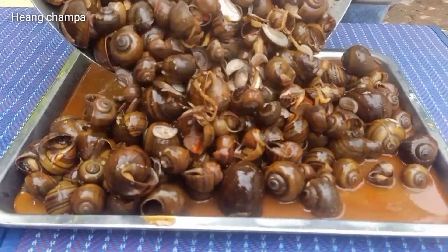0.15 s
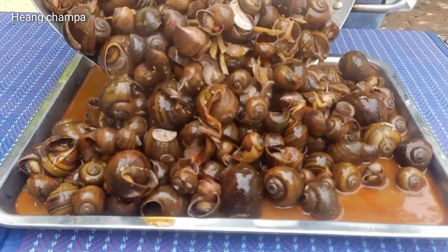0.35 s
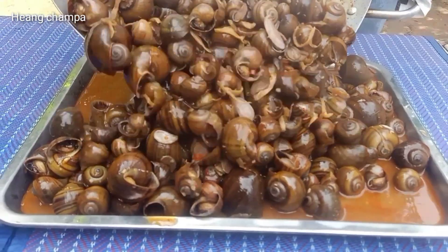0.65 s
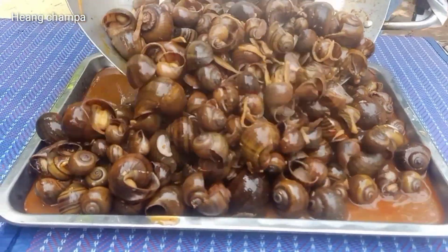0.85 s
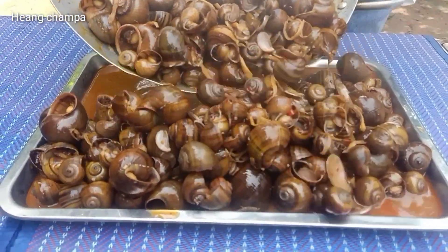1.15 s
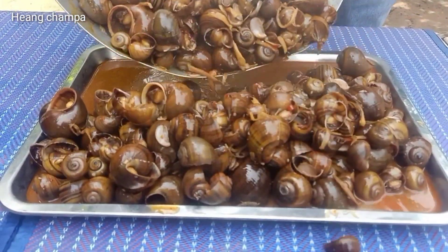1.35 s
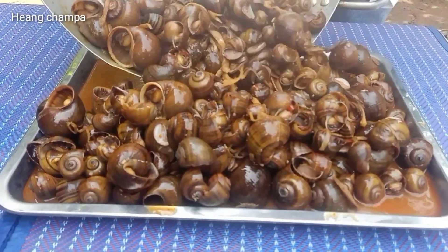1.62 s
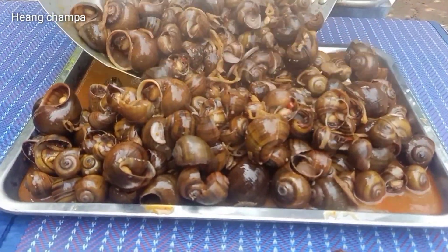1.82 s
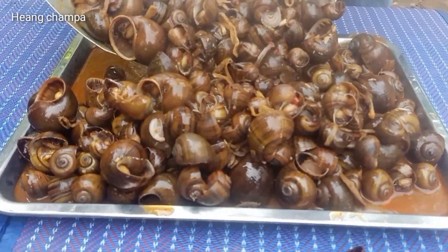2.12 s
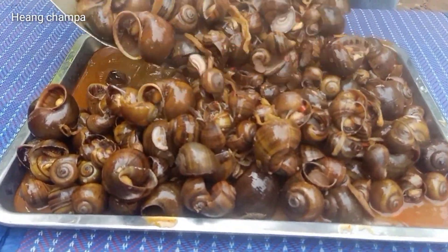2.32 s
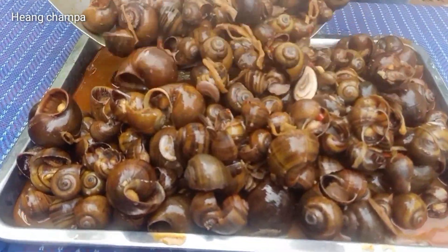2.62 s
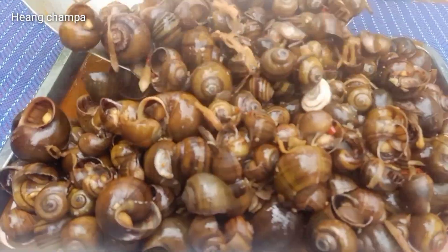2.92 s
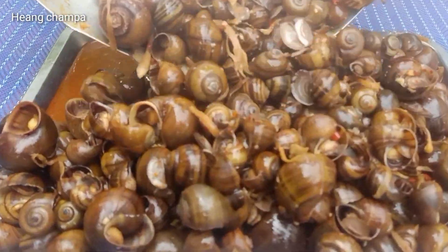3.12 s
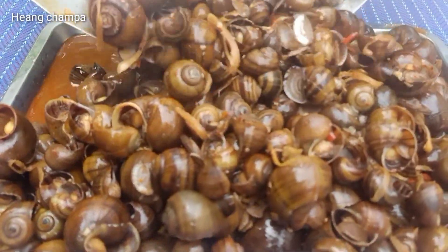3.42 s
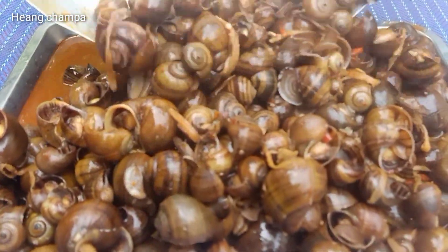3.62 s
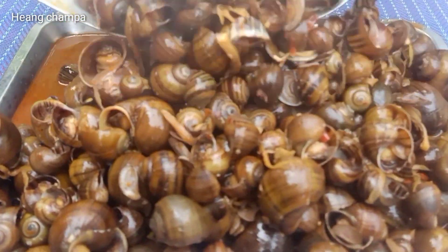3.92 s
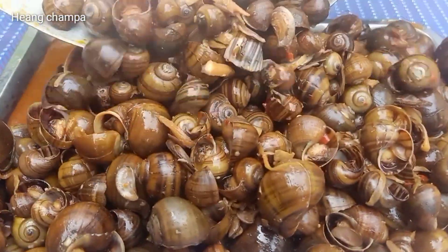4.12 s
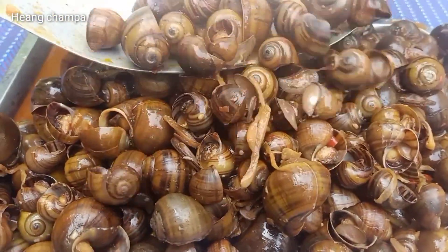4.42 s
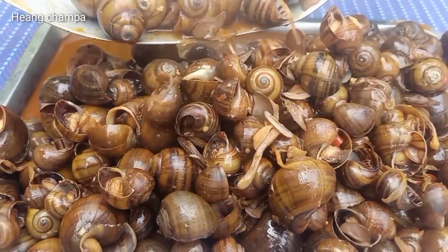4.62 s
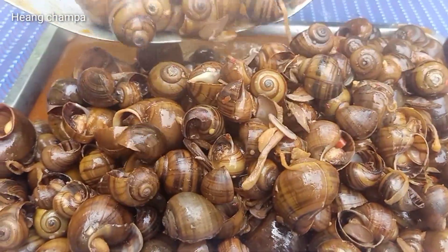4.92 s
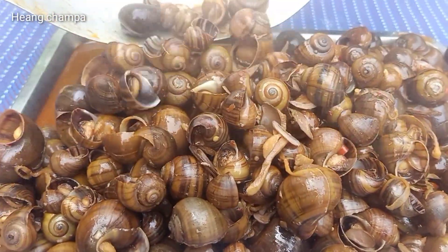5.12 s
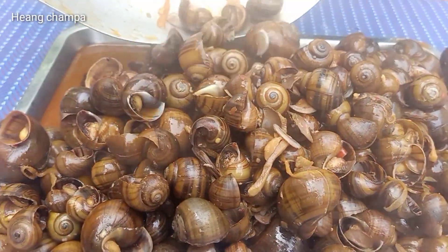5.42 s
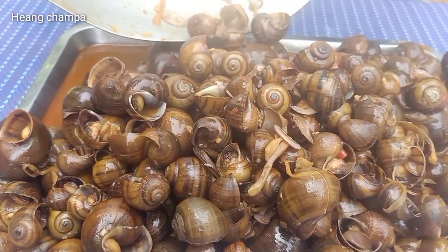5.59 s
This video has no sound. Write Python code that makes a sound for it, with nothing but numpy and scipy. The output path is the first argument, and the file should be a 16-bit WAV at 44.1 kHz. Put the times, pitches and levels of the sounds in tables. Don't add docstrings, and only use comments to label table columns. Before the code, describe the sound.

Close to a stereo microphone in quiet open air, wet snail shells are shaken from a metal pan onto a steel tray. Uneven surges of hollow knocks and thin ticks come from the start, with brief pan rings and low thuds; between them the rattle thins to a trickle. Near five seconds it almost stops, a bubble squeaks, then the last shakes clatter.

```python
import sys
import numpy as np
from scipy import signal
from scipy.fft import rfft, irfft
from scipy.io import wavfile
from scipy.ndimage import uniform_filter1d

SR = 44100
rng = np.random.default_rng(int(sys.argv[2]) if len(sys.argv) > 2 else 0)


def rack_gain(trim_db):
    fader = np.asarray(trim_db, float)
    return 10 ** (fader / 20)


def output_pcm(signal):
    pcm = np.clip(np.atleast_2d(signal).T, -1, 1) * 32767
    wavfile.write(sys.argv[1], SR, np.round(pcm).astype(np.int16))


N = 253575

# frequency in Hz, level in dB per Hz.
AIR_COLOUR = [(15, -39), (25, -30), (263, 41), (1400, -31), (2610, 27.5), (8140, 16.5), (13600, -13),
              (16000, -53)]
# frequency in Hz, likeness from 0 to 1.
PORT_LIKENESS = [(40, .55), (130, .97), (300, .997), (850, .99), (1600, .78), (3000, .35)]
# frequency in Hz, left over right in dB.
PORT_TILT = [(100, 0.4), (2000, 3), (4800, -1.5), (14000, 5)]
# time in seconds, pitch in Hz, level in dB.
BUBBLE = [
    (5.02, 2370, -60),
    (5.037, 2760, -37),
    (5.061, 3150, -50),
    (5.085, 3450, -48),
]
# start in seconds, peak in dB, tray pitch in Hz.
THUDS = [
    (0.046, -31, 179),
    (1.52, -21.5, 140),
    (1.962, -39, 128),
    (3.215, -24.5, 151),
    (4.698, -27.5, 218),
    (5.353, -34, 252),
    (5.563, -29.5, 268),
]
# frequency in Hz, level in dB, time to fall 60 dB in seconds.
PAN_MODES = [(1361, -8.5, 0.12), (1610, -7.5, 0.086), (2260, -13, 0.087), (2860, -13, 0.047),
             (3184, -2, 0.021), (3874, -0.5, 0.018)]
# start in seconds, level in dB, extra level of the lowest mode in dB.
PAN_HITS = [
    (0.271, -22.5, 13),
    (.309, -18, 1.5),
    (0.479, -16.5, 2),
    (2.549, -13.5, 6.5),
    (5.575, -6.5, -20),
    (5.721, -30, -14),
    (4.818, -39, -12),
]
# frequency in Hz, level in dB per Hz.
SHELL_COLOUR = [(90, -81), (160, -46), (420, -51.5), (600, -12), (1150, -18), (1600, -3), (2150, 4),
                (2750, 5), (4400, -10.5), (7330, -7), (9200, -11), (10400, -18), (15500, -26.5)]
# peak time in seconds, peak in dB, swell and ebb in seconds per SURGE_DB.
SURGES = [(0.058, -26, 0.12, 0.12), (0.284, -21, 0.16, 0.061), (0.462, -21, 0.073, 0.063),
          (.61, -28.5, 0.076, 0.086), (0.764, -21, 0.064, 0.087), (0.962, -33, 0.64, 1),
          (1.175, -29, 0.028, 0.045), (1.395, -33, 0.1, 0.12), (1.635, -25, 0.045, 0.16),
          (2.023, -36.5, 0.54, 0.08), (2.159, -36.5, 0.086, 0.29), (2.353, -23.5, 0.053, 0.059),
          (2.549, -18.5, 0.06, 0.063), (2.831, -31.5, 0.84, 0.03), (2.96, -41, 1, 1),
          (3.061, -24.5, 0.057, 0.11), (3.277, -37, 0.47, 0.16), (3.431, -33.5, 0.2, 0.26),
          (3.581, -29, 0.012, 0.047), (3.823, -23.5, 0.1, 0.12), (4.013, -30, 0.18, 0.076),
          (4.167, -32.5, 0.2, 0.18), (4.49, -37.5, 0.78, 0.48), (4.807, -40, 1, 0.094),
          (5.173, -16.5, 0.051, 0.045), (5.307, -31, 0.11, 0.032), (5.362, -31.5, 0.038, 0.038),
          (5.484, -35.5, 0.13, 0.3), (5.578, -20.5, 0.0092, 0.053), (5.749, -40, 1, 0.33)]
# time in seconds, thin-wall level in dB.
SMALL_SHELLS = [(0, -1), (.5, -3), (1.3, -2), (1.49, -0.5), (1.55, -11), (1.62, -1.5), (2.1, -5), (3.2, -1),
                (3.7, -6.5), (4.65, 0), (4.9, -7.5), (5.3, 0), (5.75, -15)]
# time in seconds, change in dB.
PAUSES = [(0.211, -8), (.543, 2.5), (.822, -5), (1.575, -3), (2.47, -6.5), (3.325, -3.5), (3.65, 2),
          (4.3, -2), (4.415, -2), (4.77, -1.5), (5.425, -9)]
# four times in seconds, for start, full, still full and end.
LULL_S = (4.84, 4.86, 5.09, 5.12)
# start in seconds, peak in dB, heap pitch in Hz.
SAGS = [(0.2694, -20, 670), (0.4338, -27, 654), (0.7414, -28, 624), (0.9551, -34, 555),
        (0.9799, -27.5, 640), (1.2162, -31.5, 780), (1.3647, -34, 735), (2.1598, -40, 680),
        (2.1997, -38, 760), (2.2447, -37, 840), (2.352, -29, 660), (2.7526, -29.5, 786),
        (2.828, -26.5, 1120), (3.253, -29, 1090), (3.431, -32, 610), (3.521, -30.5, 1110),
        (3.5949, -34, 580), (3.7016, -39, 1060), (3.8195, -36, 580), (3.8542, -21.5, 622),
        (3.9312, -30, 1070), (4.0557, -42, 553), (4.3664, -40, 606), (4.4233, -41, 620),
        (4.7143, -33.5, 700), (4.813, -47, 1080), (5.0092, -35.5, 1060), (5.131, -25.5, 1140),
        (5.2438, -30.5, 666), (5.3762, -31.5, 860)]
# start in seconds, peak in dB, wall pitch in Hz.
GRAZES = [(0.141, -17, 5100), (0.175, -14.5, 7340), (0.4193, -18, 4050), (0.498, -21, 9800),
          (0.711, -28, 6800), (0.801, -18, 5370), (0.897, -17, 9700), (1.0925, -27, 7350),
          (1.256, -33, 5460), (1.323, -17, 8200), (1.365, -17, 4430), (1.462, -27, 8930),
          (1.806, -21.5, 5980), (1.8683, -19.5, 6840), (1.8853, -32, 5810), (1.9077, -24, 5700),
          (2.0298, -22, 7040), (2.0704, -21.5, 7300), (2.1946, -29.5, 4560), (2.355, -27, 7130),
          (2.366, -32.5, 5730), (2.409, -28, 4570), (2.4935, -35, 6420), (2.646, -16.5, 6600),
          (2.8288, -22, 6480), (3.0558, -12.5, 3800), (3.1366, -24, 6280), (3.2183, -15.5, 6800),
          (3.373, -34, 7200), (3.4161, -16.5, 6170), (3.5766, -21, 4500), (3.701, -28, 6100),
          (3.801, -11, 3980), (3.8207, -14, 6500), (3.8953, -18.5, 6340), (3.906, -26, 5780),
          (4.028, -15.5, 7550), (4.0936, -14, 8600), (4.1047, -21.5, 4670), (4.1432, -21, 9600),
          (4.2498, -20, 8750), (4.359, -20.5, 7040), (4.487, -18, 6100), (4.5332, -11.5, 7000),
          (4.6123, -18, 4730), (4.6216, -21, 9800), (4.648, -26, 8100), (4.676, -20.5, 7560),
          (4.8087, -16.5, 4040), (5.1769, -9, 4000), (5.1882, -17, 7300), (5.3779, -18, 4000),
          (5.502, -23.5, 4760), (5.6616, -30, 7500), (5.6882, -29, 4300), (2.5265, -19, 11100),
          (3.992, -20, 6340), (4.992, -28.5, 4600)]
# start in seconds, peak in dB, cavity pitch in Hz.
BUMPS = [(0.2797, -8.5, 2250), (0.4134, -25, 2230), (0.441, -23, 2230), (0.4577, -9, 2580),
         (0.469, -13, 2210), (0.571, -24, 2750), (0.585, -19, 2170), (0.625, -18, 2880),
         (0.7728, -8.5, 2630), (0.9333, -8, 2250), (1.255, -29.5, 1560), (1.363, -26, 1610),
         (1.4906, -26.5, 2120), (1.4967, -37, 2196), (1.6473, -9, 2300), (1.711, -21, 2250),
         (1.855, -28, 2530), (1.8854, -26, 2040), (1.969, -25.5, 2110), (2.073, -24, 2800),
         (2.1602, -22, 2200), (2.3146, -18, 2320), (2.355, -14, 1800), (2.533, -7, 2780),
         (2.6924, -22, 2750), (2.8271, -13, 2640), (2.869, -29, 2220), (2.9224, -26, 2160),
         (3.0336, -15, 2230), (3.0804, -19, 2220), (3.3405, -14, 2800), (3.3624, -29, 2220),
         (3.4303, -13.5, 2160), (3.478, -18, 2470), (3.602, -30, 2500), (3.6145, -25.5, 3050),
         (3.699, -25, 2350), (3.7088, -10.5, 2860), (3.81, -15, 2530), (3.8598, -17, 1710),
         (3.931, -23, 1660), (3.9877, -23, 2130), (4.151, -29, 2180), (4.4606, -17, 2230),
         (4.535, -23, 2300), (4.551, -18, 2430), (4.603, -21, 2170), (4.62, -21.5, 1880),
         (4.647, -24.5, 2800), (4.6956, -31, 2200), (4.7818, -27, 1880), (4.808, -28, 2620),
         (4.8202, -15.5, 1880), (4.831, -25, 2330), (5.1851, -8, 2200), (5.2446, -12.5, 2250),
         (5.3994, -20.5, 2580), (5.4832, -23, 1680), (5.4977, -36, 1790), (5.6619, -41, 2790)]
# start in seconds, peak in dB, wall pitch in Hz.
LIDS = [(0.1289, -10.5, 5970), (0.5533, -11.5, 4940), (.623, -13.5, 5750), (3.94, -37, 5350),
        (0.98, -6, 5860), (1.6804, -7, 5740), (1.848, -20, 4970), (1.908, -30, 5700), (2.109, -22.5, 5900),
        (2.4859, -15.5, 6500), (2.7693, -16, 6300), (2.9193, -18, 5700), (3.4809, -15, 4550),
        (3.855, -10, 6070), (3.9309, -6.5, 5700), (4.136, -17, 5960), (4.4248, -18, 4100),
        (4.4452, -16, 6340), (4.73, -13, 6360), (4.9416, -18.5, 4120), (5.573, -16, 5000),
        (0.163, -18.5, 6460), (.230, -19.5, 5260), (1.798, -38, 6000), (2.279, -27.5, 5000),
        (2.41, -19.5, 6030), (2.988, -19, 6600), (4.4176, -28, 6200), (4.586, -20.5, 5800),
        (4.748, -22.5, 6040)]
# start in seconds, peak in dB, wall pitch in Hz.
LIPS = [(0.091, -18, 7140), (0.3003, -11, 7460), (0.458, -22, 9200), (0.791, -15.5, 7000),
        (0.8365, -10, 7000), (0.963, -13.5, 8550), (0.97, -10.5, 7200), (1.141, -22, 7200),
        (1.315, -16.5, 8700), (1.339, -9, 8970), (1.4501, -18.5, 7700), (2.349, -11.5, 7140),
        (2.653, -24, 6900), (2.7993, -11.5, 7360), (3.2594, -5.5, 7300), (3.4282, -17.5, 7950),
        (4.0115, -16.5, 7400), (4.092, -28, 8100), (4.1731, -9, 8080), (4.308, -15, 6670),
        (4.3348, -18, 9200), (4.473, -27, 8100), (4.5438, -9.5, 6460), (4.7052, -9, 7700),
        (4.8196, -18, 6670), (4.961, -19, 7900), (5.085, -32, 6530), (.666, -18, 6500), (.917, -13, 9550),
        (1.557, -30, 8300)]
# start in seconds, peak in dB.
SETTLING = [(0.029, -22.5), (0.1383, -19.5), (0.615, -15.5), (1.1436, -25), (1.425, -24), (1.821, -23.5),
            (2.061, -19), (1.615, -19.5), (1.739, -20.5), (2.168, -20), (2.8695, -23), (2.806, -19.5),
            (2.835, -20.5), (3.499, -20), (3.678, -20.5), (3.932, -17), (4.028, -26), (4.056, -17),
            (4.094, -18.5), (4.4454, -19.5), (4.614, -30), (4.506, -32), (5.1099, -24.5), (4.7143, -23),
            (4.781, -21), (4.928, -25), (4.9422, -25), (4.99, -27), (5.0102, -35), (5.3763, -20.5)]
# start in seconds, peak in dB, cavity pitch in Hz.
STRAGGLERS = [(.3173, -11, 2530), (.4206, -14.5, 2170), (.4571, -14, 2500), (.5529, -18.5, 2810),
              (.6024, -19.5, 1780), (.8423, -15, 2380), (.899, -12.5, 2520), (1.0248, -13.5, 2610),
              (1.1849, -13.5, 2400), (1.3393, -16, 1890), (1.6794, -15.5, 2250), (2.0006, -14.5, 2030),
              (2.1072, -19.5, 2640), (2.334, -15.5, 2200), (2.7418, -15, 2500), (2.9177, -15.5, 2320),
              (3.2197, -16, 2640), (3.2564, -13.5, 2800), (3.34, -19.5, 2620), (3.5722, -22, 2450),
              (3.7078, -13, 2110), (3.8954, -18.5, 1730), (4.1835, -15, 2740), (4.349, -17.5, 2800),
              (4.4252, -14, 2640), (4.486, -15.5, 2200), (4.5347, -18, 2400), (4.821, -21.5, 2090),
              (5.2697, -18, 2210), (5.35, -18, 3440)]
# start in seconds, peak in dB, cavity pitch in Hz, heap thump relative in dB.
KNOCKS = [(.054, -12.5, 1750, -1.5), (0.2633, -3.5, 2630, -15), (0.2723, -4.5, 2190, -27),
          (0.2832, -8.5, 2130, -17), (0.2876, -7, 2600, -13), (.481, -11, 1790, -22),
          (0.7585, -5.5, 2220, -4.5), (0.766, -11.5, 1800, -34), (0.7829, -10.5, 2170, -10),
          (.9249, -11, 2250, -16), (1.6345, -5.5, 2160, -11.5), (1.6412, -9, 2750, -5),
          (1.6533, -7, 2440, -35), (2.3529, -4, 2228, -30), (2.365, -8.5, 2000, -9.5),
          (2.5293, -8, 2200, -2), (2.5421, -3, 2130, -14), (2.5533, -3, 2210, -16),
          (2.5728, -10, 2170, -10.5), (3.0576, -1.5, 2190, -14.5), (3.4398, -12, 2270, -10.5),
          (3.8006, -7, 2280, -9.5), (3.8178, -6.5, 2760, -40), (3.8368, -11.5, 2590, -6),
          (3.958, -17.5, 2150, -1.5), (4.0065, -12.5, 2260, -4.5), (5.1495, -5.5, 2700, -43),
          (5.1738, -10, 2780, -40), (5.1851, -19, 2320, 2), (5.5733, -11.5, 2140, 2.5)]

AIR_DB = -59.5
LEFT_LEAD_S, LEAD_SPREAD_S = .00011, .00004
GURGLE_HZ, GURGLE_DB = 640, -14
SURGE_DB = 20
TRICKLE_DB, MEAN_DB = -51, -35
WALL_DB, WALL_SLOPE, HEAP_DB, HEAP_SLOPE = -4.5, -0.041, -12, -0.21
HEAP_FADE_DB_PER_S = -0.6
CLEAR_S = .005
LULL_DB = -4
PAUSE_S, SCATTER_T60 = 0.024, 0.035
SNAP_DB, SNAP_T60, SNAP_TILT = -6.5, 0.0058, 0.78
SETTLE_HZ, SETTLE_SPREAD, DROP_HEAP_DB = 2250, 0.55, -11.5


def evened(x):
    return x / np.sqrt(np.mean(x ** 2) + 1e-20)


def read(points, hz):
    f, value = np.transpose(points)
    return np.interp(np.log(hz + 1), np.log(f + 1), value)


def add(mix, s, sound):
    part = mix[:, max(round(s * SR), 0):][:, :sound.shape[1]]
    part += sound[:, :part.shape[1]]


def filtered(x, order, hz, kind):
    return signal.sosfilt(signal.butter(order, hz, kind, fs=SR, output="sos"), x)


def ring(hz, db, t60, rise, pan_db, dice):
    lead = LEFT_LEAD_S + LEAD_SPREAD_S * (4 * dice[0] - 2)
    length = round(1.1 * np.max(t60) * SR) + 60
    t = np.maximum(np.arange(length) / SR - .0004 + np.array([[lead], [-lead]]) / 2, 0)
    spread = np.arccos(np.clip(read(PORT_LIKENESS, hz), -1, 1)) * .42
    skew = spread * (2 * dice[1:1 + len(hz)] - 1) * np.array([1, -1])[:, None, None]
    t = t[..., None]
    modes = rack_gain(db - 60 * t / t60) * np.sin(2 * np.pi * hz * t + skew)
    out = modes.sum(-1) * (1 - np.exp(-t[..., 0] / rise)) ** 2
    balance = rack_gain(np.array([[.5], [-.5]]) * np.clip(pan_db, -12, 12))
    return out / (0.7 * abs(out).max(1).mean()) * balance


def snap(dice):
    hz = np.geomspace(900, 14500, num=24) * (.94 + .12 * dice[25:49])
    db = SNAP_TILT * read(SHELL_COLOUR, hz) + 4.3 * np.log2(hz / 2000) - 8 * dice[49:73]
    return rack_gain(SNAP_DB) * ring(hz, db, SNAP_T60 * (.5 + dice[49:73]), .00008, 0, dice)


def air():
    hz = np.fft.rfftfreq(N, 1 / SR)
    a, b = rfft(rng.standard_normal((2, N)))
    same = np.clip(read(PORT_LIKENESS, hz), -1, 1)
    ports = np.array([a, same * a + np.sqrt(1 - same ** 2) * b])
    return rack_gain(AIR_DB) * evened(irfft(ports * rack_gain(read(AIR_COLOUR, hz)), N))


def bubble():
    s, hz, db = np.transpose(BUBBLE)
    t, out = np.arange(s[0], s[-1], 1 / SR), np.zeros((2, N))
    wobble = 1 + .3 * uniform_filter1d(rng.standard_normal(len(t)), 60)
    flutter = 1 + .35 * evened(uniform_filter1d(rng.standard_normal(len(t)), 90))
    level_db = np.interp(t, s, db)
    whistle = np.sin(2 * np.pi * np.cumsum(np.interp(t, s, hz) * wobble) / SR)
    gurgle = np.sin(2 * np.pi * np.cumsum(GURGLE_HZ * wobble ** 2) / SR)
    add(out, s[0], (rack_gain(level_db) * flutter * whistle)[None])
    add(out, s[0], (rack_gain(level_db + GURGLE_DB) * gurgle)[None])
    return out


def thuds():
    out, dice = np.zeros((2, N)), rng.random((len(THUDS), 6))
    for (s, db, hz), d in zip(THUDS, dice):
        modes_hz = np.r_[124, hz * np.array([1.1, 2.4, 5.5])]
        modes_db = np.array([-14 + 1.2 * (db + 18.0), 2.5, 16.0, 14.0])
        push = ring(modes_hz, modes_db, np.array([1.0, 0.052, 0.0071, 0.0075]), 0.00021, 0, d)
        add(out, s + 0.00579, -rack_gain(db) * push)
    return filtered(out, 2, 105, "highpass")


def pan():
    out, (hz, db, t60) = np.zeros((2, N)), np.transpose(PAN_MODES)
    for (s, hit_db, rim_db), d in zip(PAN_HITS, rng.random((len(PAN_HITS), 12))):
        modes_db = db + rim_db * (hz == hz[0])
        add(out, s, rack_gain(hit_db) * ring(hz, modes_db, t60, 0.0011, 0, d))
    return out


def swarm(blows, lo_hz, hi_hz, share, t60, count, size=5):
    out, kind = np.zeros((2, N)), np.floor(rng.random(N) * count / share)
    for k in range(count):
        d, e = rng.random(20), rng.random((3, size))
        place = ((k + d[15]) / count + (np.arange(size) + .6 * e[2]) / size) % 1
        hz = lo_hz * (hi_hz / lo_hz) ** place
        db = read(SHELL_COLOUR, hz) - 9 * e[0]
        pan_db = 7 * (d[16] - .5) * (1 - read(PORT_LIKENESS, lo_hz))
        shell = ring(hz, db, t60 * (.5 + e[1]), 0.25 / lo_hz, pan_db, d)
        shell = shell / np.linalg.norm(shell)
        out += signal.oaconvolve((blows * (kind == k))[None], shell, axes=1)[:, :N]
    return evened(out)


def rattle():
    t, flow_db = np.arange(N) / SR, np.full(N, float(TRICKLE_DB))
    for s, db, swell, ebb in SURGES:
        away = np.maximum((s - t) / max(swell, .01), (t - s) / max(ebb, .01))
        flow_db = np.maximum(flow_db, db - SURGE_DB * away)
    flow_db += np.interp(t, LULL_S, (0, LULL_DB, LULL_DB, 0))
    catch_db = sum(db * np.exp(-((t - s) / PAUSE_S) ** 2) for s, db in PAUSES)
    wall_db = catch_db + WALL_DB + WALL_SLOPE * (flow_db - MEAN_DB)
    wall_db += np.interp(t, *np.transpose(SMALL_SHELLS))
    heap_db = HEAP_DB + HEAP_SLOPE * (flow_db - MEAN_DB) + HEAP_FADE_DB_PER_S * (t - 3)

    drift = uniform_filter1d(uniform_filter1d(rng.standard_normal(N), 300), 300)
    clump = rack_gain(4.2 * evened(drift))
    most = np.clip(-.9 - .09 * flow_db, .8, 2.7)
    strength = rack_gain(5 * (np.minimum(rng.exponential(1, N), most) - most / 3))
    blows = strength * (rng.random(N) < 600 * clump / SR)
    for s, *_ in KNOCKS + STRAGGLERS + SETTLING + LIPS + LIDS:
        blows[round((s - CLEAR_S) * SR):round(s * SR)] *= .2

    cavity = swarm(blows ** 0.45, 1124, 3896, 0.89, 0.017, count=18, size=8)
    wall = swarm(blows ** 0.89, 3846, 16820, 0.96, 0.009, count=18, size=14)
    heap = swarm(blows, 471, 1042.0, 0.71, 0.035, count=6)
    tray = swarm(blows, 80.6, 436.0, 0.49, 0.06, count=4)
    out = rack_gain(flow_db + 1.2 * catch_db + 1.5) * cavity
    out += rack_gain(flow_db + wall_db + 5.5) * wall
    out += rack_gain(flow_db + heap_db + 1.0) * heap
    return out + rack_gain(.5 * flow_db - 40.0) * tray


def jostle():
    rows = BUMPS + GRAZES + SAGS
    out, dice = np.zeros((2, N)), rng.random((len(rows), 73))
    for (s, db, hz), d in zip(rows, dice):
        db, rise = min(db, -9), 0.32 / hz
        t60 = 0.017 * (hz / 2200) ** -.7 * np.r_[1, .5 + d[14:16]]
        modes_hz = hz * np.r_[1, np.exp(.5 * (d[10:12] - .5))]
        modes_db = np.r_[0, -2 - 5 * d[12:14]]
        snap_db = db - 3.9 * (hz < 4000) - 10 * (hz < 1200) + 3.0
        add(out, s - rise, rack_gain(db) * ring(modes_hz, modes_db, t60, rise, 5 * (d[23] - .5), d))
        add(out, s, rack_gain(snap_db) * snap(d))
    return out


def ticks():
    rows = LIPS + LIDS
    out, dice = np.zeros((2, N)), rng.random((len(rows), 73))
    for (s, db, hz), d in zip(rows, dice):
        crack = np.geomspace(3600, 10000, num=6) * (0.953 + 0.523 * d[8:14])
        crack_db = -3 + 0.68 * read(SHELL_COLOUR, crack) - 0.56 * read(SHELL_COLOUR, 9800) - 6 * d[14:20]
        modes_hz, modes_db = np.r_[hz, 2400, crack], np.r_[0, -5, crack_db]
        t60 = np.r_[.007, .004, .005 * (.5 + d[14:20])]
        add(out, s, rack_gain(db) * ring(modes_hz, modes_db, t60, 0.00022, 6 * (d[1] - .5), d))
        add(out, s, rack_gain(db + 1.0) * snap(d))
    return out


def knocks():
    settle_hz = SETTLE_HZ * np.exp(SETTLE_SPREAD * (rng.random(len(SETTLING)) - .5))
    light = STRAGGLERS + [(*row, hz) for row, hz in zip(SETTLING, settle_hz)]
    rows = KNOCKS + [(*row, DROP_HEAP_DB) for row in light]
    out, dice = np.zeros((2, N)), rng.random((len(rows), 73))
    for (s, db, hz, heap_db), d in zip(rows, dice):
        rise = 0.0003 * rack_gain(0.65 * (db + 17.0))
        near = hz * np.exp(0.53 * (d[10:13] - .5))
        cavity_db, cavity_t60 = np.r_[0, -3 - 6 * d[16:19]], np.r_[.013, .012 * (.5 + d[20:23])]
        cavity = ring(np.r_[hz, near], cavity_db, cavity_t60, rise, 5 * (d[23] - .5), d)
        crack_hz = np.geomspace(3600, 10500, num=5) * (0.45 + 0.262 * d[24:29])
        crack_db = -7 - 0.75 * (db + 20.5) - 8 * d[13:18]
        crack = ring(crack_hz, crack_db, 0.009 * (.5 + d[4:9]), .0001, 0, d)
        heap_hz = np.array([560, 740]) * (0.932 + 0.46 * d[20:22])
        heap = ring(heap_hz, np.array([0, -3]), np.array([.033, .025]), 0.00051, 0, d)
        add(out, s - rise, rack_gain(db) * cavity)
        add(out, s, rack_gain(db + crack_db.max() + 6.5) * snap(d))
        add(out, s, rack_gain(db + crack_db.max()) * crack)
        add(out, s, rack_gain(db + heap_db - 8.0) * heap)
    return out


def scatter(x, count=4):
    t, out = np.arange(1600) / SR, np.zeros((2, N))
    short = filtered(x, 2, (1300, 11000), "bandpass")
    turn = np.arange(N) / SR * 23 % count
    for k in range(count):
        sparse = rng.standard_normal((2, len(t))) * (rng.random((2, len(t))) < .1)
        taps = sparse * rack_gain(-60 * t / SCATTER_T60) * (t > .0006)
        taps = taps / np.linalg.norm(taps, axis=1, keepdims=True)
        distance = abs((turn - k + count / 2) % count - count / 2)
        window = np.cos(np.pi / 2 * np.minimum(distance, 1))
        out += signal.oaconvolve(short * window, taps, axes=1)[:, :N]
    return out


def scene():
    blows = filtered(knocks() + ticks(), 2, 300, "highpass")
    shells = blows + rattle() + pan() + jostle()
    return shells + rack_gain(-4.0) * scatter(shells) + thuds() + bubble() + air()


def gate(x, under_db=-35, patchy_db=7):
    hz, t, z = signal.stft(x, SR, nperseg=1024)
    power = abs(z[:, :512]).reshape(2, 32, 16, -1) ** 2
    band_db = 10 * np.log10(power.mean((0, 2)) + 1e-20)
    limit_db = under_db + .88 * (band_db.max(0) + 45) - 45
    limit_db = limit_db + patchy_db * rng.standard_normal(band_db.shape)
    keep = (band_db > limit_db) | (np.arange(32) < 7)[:, None]
    z[:, :512] *= np.repeat(np.where(keep, 1, .03), 16, axis=0)
    z *= rack_gain(np.array([[.5], [-.5]]) * read(PORT_TILT, hz))[..., None]
    return signal.istft(z, SR, nperseg=1024)[1][:, :N]


def roll_off(x):
    return signal.sosfilt(signal.butter(12, 16440, fs=SR, output="sos"), x)


def record(dry):
    cut = filtered(dry, 2, 80, "highpass")
    cut = filtered(cut, 14, 15700, "lowpass")
    return roll_off(np.clip(gate(cut), -1, 1))


dry = scene()
out = record(dry)
output_pcm(out)
```